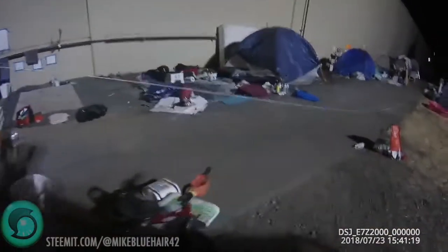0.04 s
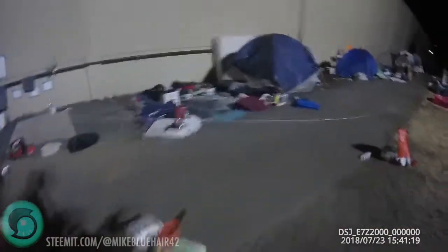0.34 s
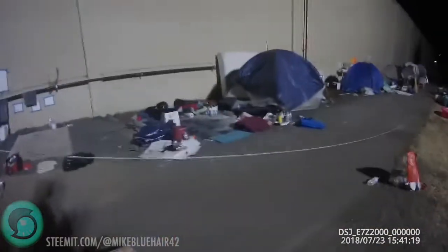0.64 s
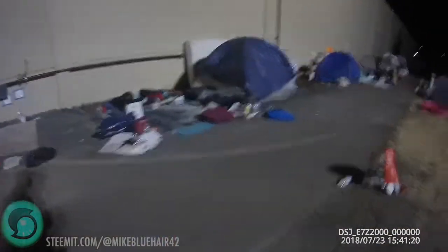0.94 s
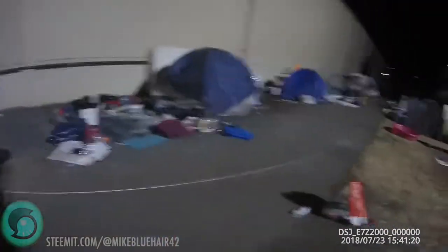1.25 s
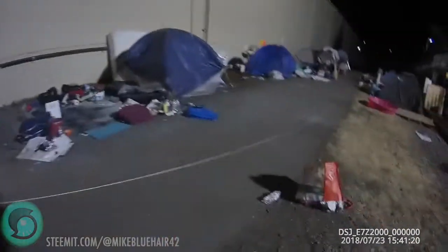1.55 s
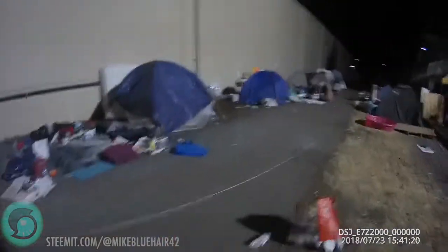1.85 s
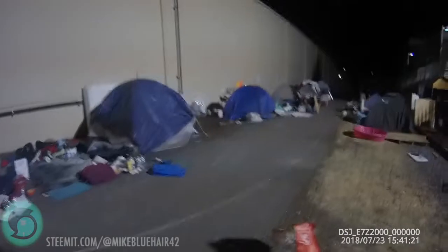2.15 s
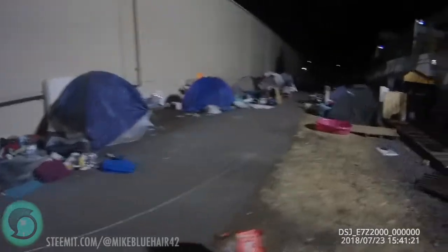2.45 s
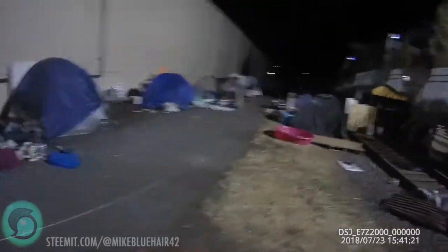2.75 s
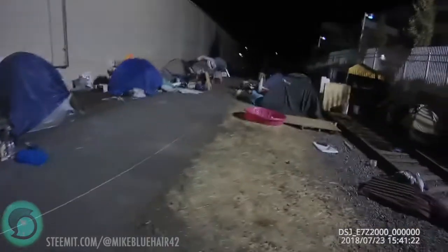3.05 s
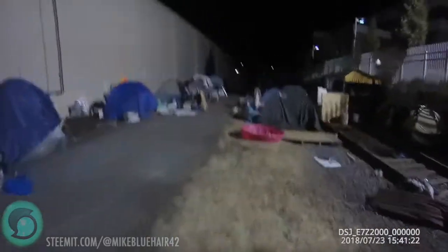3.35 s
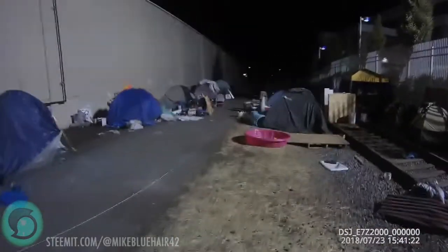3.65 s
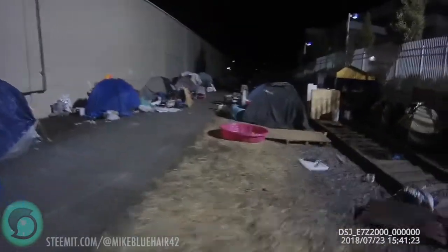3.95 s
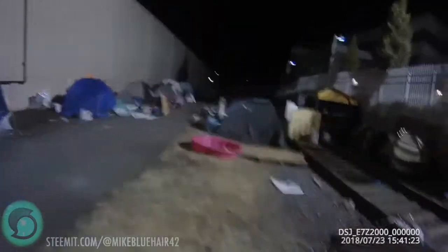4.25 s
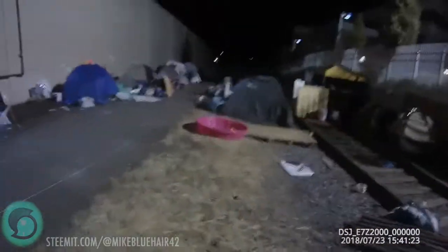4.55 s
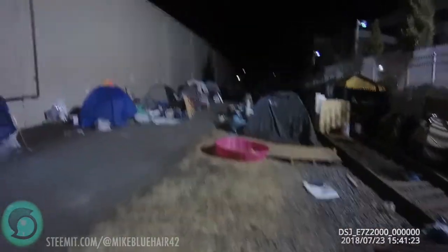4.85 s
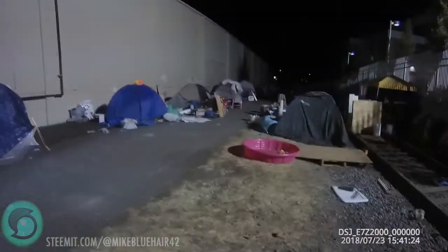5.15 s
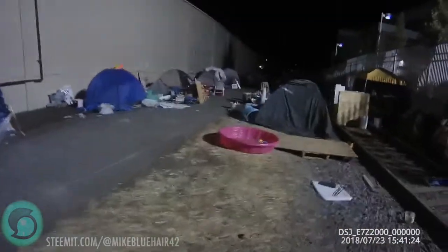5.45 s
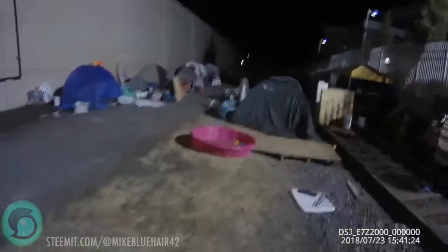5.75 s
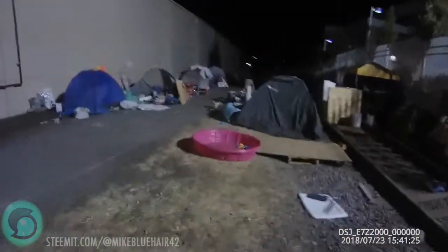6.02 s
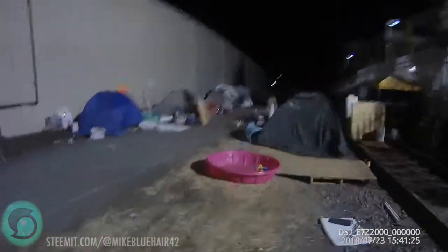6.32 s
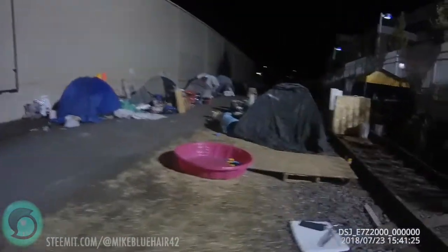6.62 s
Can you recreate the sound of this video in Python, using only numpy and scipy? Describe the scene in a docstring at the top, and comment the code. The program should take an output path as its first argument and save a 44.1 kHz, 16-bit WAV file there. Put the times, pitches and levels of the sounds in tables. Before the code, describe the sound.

A generator's low, steady drone runs under someone walking on snapping, scuffing gravel, then stepping quietly across dry grass.

```python
"""At night, a generator drones near a small mono microphone, over a hum, a town's wash and a faint hiss.
Someone walks over gravel and litter: stones snap under the soles, heels knock and grit scuffs.
From about two to four seconds in, a faint, far whine sinks in pitch.
Then the walker is on dry grass, and the last steps are soft knocks with tiny ticks of stalks."""
import sys
import numpy as np
from scipy import signal
from scipy.fft import rfft, irfft
from scipy.io import wavfile

SR = 44100
rng = np.random.default_rng(int(sys.argv[2]) if len(sys.argv) > 2 else 0)


def pcm_store(signal):
    """Save signal as 16-bit PCM."""
    levels = np.round(np.clip(np.atleast_2d(signal), -1, 1) * 32767)
    wavfile.write(sys.argv[1], SR, levels.astype(np.int16).T)


N = 298998
TIME = np.arange(N) / SR


# The loudest stones that snap under a sole. Body (lows) and fizz (highs) are relative to the level.
# (time [s], level [dB], ring pitch [Hz], body [dB], fizz [dB], fade time [s])
LOUD_STONES = [(0.2334, -33.5, 4800, -12, -35, 0.0065), (.6251, -27.5, 2210, -14, -17.5, 0.00025),
               (0.882, -27, 5300, -8.5, -11, 0.0011), (0.951, -35, 5700, -1, -19, .0013),
               (0.9842, -29.5, 3530, -20, -31, 0.005), (1.0154, -19, 2960, -10, -16, .00045),
               (1.0921, -23.5, 2900, -4, -9, 0.0025), (1.1004, -19.5, 2720, -5, -20, 0.0037),
               (1.1788, -30.5, 1520, -0.5, -33, 0.0011), (1.244, -22.5, 2800, -3.5, -16, 0.0027),
               (1.264, -21.5, 2640, -12, -18, 0.0014), (1.275, -28, 5540, -7, -16, .008),
               (1.3076, -24.5, 1500, -9, -17, 0.0027), (1.3445, -22, 5800, -5.5, -17, 0.0044),
               (1.358, -20.5, 4770, -7, -9, 0.0032), (1.3859, -19, 5750, -11, -14, 0.00052),
               (1.3991, -21.5, 4770, -19, -24, 0.00053), (1.4207, -17.5, 5600, -7.5, -9.5, 0.00047),
               (1.4421, -13, 4330, -13.5, -13, 0.0013), (1.4669, -9.5, 3780, -6, -17, 0.0013),
               (1.4863, -19.5, 5620, -6, -14, .001), (1.5101, -29.5, 5950, -5, -13, 0.00056),
               (1.5779, -32, 5200, 3, -24, 0.0019), (1.7862, -35, 4370, 4, -29, 0.00099),
               (1.8396, -21.5, 5670, -4.5, -17, 0.0023), (1.884, -22, 5230, -12, -18, 0.00066),
               (1.89, -26, 4730, -6, -19, 0.0065), (1.9034, -17, 5400, -18, -15, 0.0015),
               (1.9384, -29.5, 4400, -20, -5, 0.0011), (1.9975, -19.5, 5600, -19, -9, 0.00044),
               (2.0995, -31.5, 3060, -4, -17, 0.0019), (2.196, -33, 4940, -8, -8, 0.0017),
               (2.369, -14, 5330, -11.5, -10.5, 0.00088), (2.7019, -24, 2750, -5.5, -13, 0.0011),
               (2.7125, -18.5, 7200, -13, -9, 0.0008), (2.755, -15.5, 4270, -15, -13, 0.0023),
               (2.7604, -25.5, 1750, -3, -32, 0.0038), (2.8155, -27, 4500, -12, -8, 0.00074),
               (2.839, -27, 5240, -0.5, -17, 0.0016), (2.8646, -24, 1980, -8, -15.5, 0.00041),
               (3.0016, -35, 4720, -5, -20, 0.00093), (3.5622, -25, 5400, -8, -18, .0013),
               (3.6083, -25, 6000, -2.5, -4.5, 0.0035), (3.6288, -17, 6100, -27, -11, .0012),
               (3.7082, -33, 5000, -1, -12, 0.0027), (6.5516, -24, 4800, -20, -1.5, 0.00013)]
def stone_snaps():
    """Stones, large and small, give way under the walker's weight."""
    out = np.zeros(N)
    for time, *stone in LOUD_STONES + small_stones():
        offset_s, sound = one_snap(*stone)
        add(out, time + offset_s, sound)
    return out


# The tone of stone hitting stone: (frequency [Hz], relative level [dB])
STONE_TONE = [(100, -13), (350, -7), (900, -7), (2500, -0.5), (5500, -0.5), (7000, -2), (8200, -10.5),
              (10000, -9), (11500, -10.5), (14500, -16), (16000, -116)]
def one_snap(db, ring_hz, body_db, fizz_db, fade_s, grind_s=0.00013, ring_s=0.00067, settle_s=0.0072):
    """A stone grinds, slips and rings, then grit settles. Returns the start offset and the sound."""
    size, lead_in = 1500, 90  # samples
    t = (np.arange(size) - lead_in) / SR
    grinding = np.exp(-abs(t) / grind_s) / 2
    dying = np.exp(-abs(t) / fade_s) + gain_of(-30) * np.exp(-abs(t) / settle_s)
    slips = rng.standard_normal(size) * np.where(t < 0, grinding, dying)
    slips[lead_in] = 1.4  # the main slip
    ring = np.sin(2 * np.pi * ring_hz * t) * np.exp(-abs(t) / ring_s) * (t > 0)
    crack = normalize(shape_tone(slips, STONE_TONE)) + gain_of(1) * normalize(ring)
    # the bands between body and fizz share the energy, 9 dB less per octave away from the ring
    edges_hz = np.array([350, 1500, 2200, 3300, 4600, 7500, 15000])
    lows, highs = edges_hz[1:-2], edges_hz[2:-1]
    octaves_away = abs(np.log2(np.sqrt(lows * highs) / ring_hz))
    shares = np.sqrt(np.log(highs / lows)) * gain_of(-9 * octaves_away)
    bands_db = [body_db, *20 * np.log10(shares / np.linalg.norm(shares)), fizz_db]
    tone = []
    for low, high, band_db in zip(edges_hz, edges_hz[1:], bands_db):
        boost_db = band_db - level_db(crack, low, high)
        tone += [(low * 1.1, boost_db), (high / 1.1, boost_db)]
    return t[0], gain_of(db) * shape_tone(crack, tone, size=1024)


def small_stones(per_s=26, most=8, body_db=-3, fizz_db=-19, fade_s=0.0017):
    """Smaller stones give way at random while a sole drags. Returns rows like those of LOUD_STONES."""
    rows = []
    for start, end, drag_db in SOLE_DRAGS:
        times = start + (np.arange(most) + rng.random(most)) / per_s
        for time, (force, smallness) in zip(times, rng.standard_normal((most, 2))):
            if time < end:
                db = drag_db + 3 + 2 * force  # a little louder than the drag's hiss
                ring_hz = 4030 * 2 ** (0.73 * np.tanh(smallness))
                rows.append((time, db, ring_hz, body_db, fizz_db, fade_s))
    return rows


# Dull knocks of the shoes: (time [s], relative level [dB], pitch [Hz])
HEEL_STRIKES = [(0.6252, -15, 314), (0.945, -16.5, 422), (1.1016, -12, 380), (1.3054, -16.5, 264),
                (1.467, -23, 630), (1.5781, -25, 380), (1.8888, -17, 337), (2.1985, -17, 344),
                (2.7562, -10, 390), (2.8415, -22, 400), (2.8776, -10.5, 456), (3.14, -16.5, 315),
                (3.6273, -15.5, 259), (3.7113, -17, 382), (4.8957, -13.5, 530), (5.5695, -19, 630),
                (6.201, -20, 503), (6.6037, -14.5, 334), (6.673, -22, 604)]
def heel_knocks(ring_cycles=9.6, ground_fade_s=0.0096):
    """A heel lands with a hard blow, the sole rings briefly and the ground shudders."""
    out, t = np.zeros(N), TIME[:round(0.1 * SR)]
    for time, db, hz in HEEL_STRIKES:
        blow = 0.27 * np.exp(-t * hz * 2.7)
        ring = 0.5 * gain_of(-60 * t * hz / ring_cycles)
        shoe = np.sin(2 * np.pi * hz * t) * (blow + ring)
        shudder = noise_band(len(t), hz * 0.17, hz * 1.66) * np.exp(-t / ground_fade_s)
        add(out, time, gain_of(db + 0.5) * shoe + gain_of(db - 14) * shudder)
    return out


# A sole drags over loose grit: (start [s], end [s], level [dB])
SOLE_DRAGS = [(0.203, 0.335, -44), (.93, 1.054, -33), (1.053, 1.18, -46), (1.167, 1.299, -35),
              (1.299, 1.54, -45.5), (1.533, 1.587, -41.5), (1.774, 2.05, -41), (2.078, 2.263, -47),
              (2.68, 2.767, -36), (2.769, 2.954, -44.5), (2.96, 3.108, -40), (3.112, 3.216, -49.5),
              (3.347, 3.557, -50.5), (3.542, 3.73, -45), (6.66, 6.8, -52)]
# The tone of dragged grit: (frequency [Hz], relative level [dB])
GRIT_TONE = [(100, -39), (350, 17), (900, 8), (2500, 4.5), (5500, 5.5), (7000, -3), (8200, -5),
             (10000, -6.5), (14500, -11), (16000, -52)]
def scuffs(sand_db=-6, lumps_db=4):
    """Small grains rattle over a sandy hiss, swelling in uneven lumps with each drag."""
    force = np.zeros(N)
    for start, end, db in SOLE_DRAGS:
        add(force, start, gain_of(db) * signal.windows.tukey(round((end - start) * SR), 0.32))
    rattle = grains(per_s=3000, spread_db=4.5)
    sand = gain_of(sand_db) * rng.standard_normal(N)
    grit = shape_tone(rattle + sand, GRIT_TONE)
    return force * normalize(grit * gain_of(lumps_db * wobble(40)))


def grains(per_s, spread_db, damping=0.52, pitches=24):
    """Pebbles of many pitches are struck at random moments with uneven strength."""
    out = np.zeros(N)
    for hz in np.geomspace(600, 14000, pitches):
        strength = gain_of(spread_db * np.minimum(rng.exponential(1, N), 4))
        direction = rng.choice([-1, 1], N)
        struck = rng.random(N) < per_s / pitches / SR
        out += resonate(strength * direction * struck, hz, hz * damping)
    return normalize(out)


def footfalls(first_s=1.196, gap_s=0.377, length_s=0.42, count=7, db=-32.5):
    """Heavy, even steps on the gravel shake the microphone in soft, low swells."""
    weight = np.zeros(N)
    for time in first_s + gap_s * np.arange(count):
        add(weight, time - length_s / 2, signal.windows.hann(round(length_s * SR)))
    return gain_of(db) * weight * noise_band(N, 51.3, 86)


# Dry stalks that tick: (time [s], level [dB], rough pitch [Hz])
DRY_STALKS = [(.583, -41.5, 7000), (1.324, -33, 6500), (2.332, -44, 5500), (3.1534, -40, 5400),
              (5.47, -41, 6450), (6.109, -41.5, 3350), (6.199, -39.5, 1720), (6.41, -50, 11600),
              (6.605, -39.5, 5540)]
def stalk_ticks(fade_s=0.0041):
    """Each dry stalk gives a tiny burst of noise that dies at once."""
    out, t = np.zeros(N), TIME[:round(0.02 * SR)]
    for time, db, hz in DRY_STALKS:
        burst = rng.standard_normal(len(t)) * np.exp(-t / fade_s)
        tick = band(burst, hz * 0.58, hz * 1.25)
        add(out, time, tick * gain_of(db - level_db(tick, 0, SR / 2)))
    return out


def rustle(db=-59):
    """Grass and litter crackle faintly all along the way."""
    crackles = shape_tone(grains(per_s=80, spread_db=2), STONE_TONE)
    return gain_of(db) * normalize(band(crackles, 500, 12000, order=1))


def yard_echoes(sound, die_away_s=0.48, echoes_per_s=2000):
    """The ground, the tents and a wall throw back scattered echoes."""
    t = TIME[:SR // 2]
    echoes = rng.standard_normal(len(t)) * (rng.random(len(t)) < echoes_per_s / SR)
    echoes *= gain_of(-60 * t / die_away_s)
    dulled = band(echoes / np.linalg.norm(echoes), 250, 3200, order=1)
    return signal.fftconvolve(sound, dulled)[:N]


# The generator's tones, at 1, 2, 3... times its firing rate:
# (direct level [dB], share the wall throws back [0-1], quietest time [s], time between quiet spots [s])
ENGINE_TONES = [(-24.5, 0.27, 0.79, 9), (-31, 0.29, 4.02, 4.44), (-36, 0.39, 7.14, 9.5),
                (-39.5, 0.56, 2.23, 11.9), (-45.5, 0.07, 3.6, 4.9)]
def generator(firing_hz=44.41, waver=0.004, flutter_db=0.16, lag_cycles=0.059):
    """Exhaust pulses make a drone. The walker passes spots where a wall's echo partly cancels a tone."""
    firings = np.cumsum(firing_hz * (1 + waver * wobble(8.8))) / SR
    out = np.zeros(N)
    for k, (db, echo, quiet_s, spacing_s) in enumerate(ENGINE_TONES):
        with_echo = 1 - echo * np.exp(2j * np.pi * (TIME - quiet_s) / spacing_s)
        # the silencer delays the higher tones a little, which rounds each pulse
        cycles = (k + 1) * firings - lag_cycles * k ** 2 / 2
        tone = (with_echo * np.exp(2j * np.pi * cycles)).real
        out += gain_of(db - flutter_db * wobble(7)) * tone
    return np.sqrt(2) * out


# How a machine's hum swells and fades along the way: (time [s], relative level [dB])
HUM_LEVELS = [(0, -44.5), (.7, -40), (1.7, -39), (2.4, -44.5), (3.4, -38.5), (4.7, -44), (5.2, -47.5),
              (6.78, -47.5)]
def machine_hum(hz=348.8, waver_hz=1.66):
    """A machine hums in a dull wash of noise, and ends fainter as the walker leaves it behind."""
    tone = gain_of(-4.5) * sine(hz + waver_hz * wobble(6.1))
    wash = gain_of(-3) * noise_band(N, 255, 432)
    return gain_of(np.interp(TIME, *np.transpose(HUM_LEVELS))) * (tone + wash)


# Steady tones of far machines: (pitch [Hz], width of the waver [Hz], level [dB])
MACHINE_TONES = [(1094, 4.9, -56.5), (1590, 3.8, -81), (2182, 20.7, -64), (6230, 183, -80)]
def far_machines(flutter_db=0.53):
    """Far machines give faint tones that waver in pitch and loudness."""
    out = np.zeros(N)
    for hz, width, db in MACHINE_TONES:
        out += gain_of(db + flutter_db * wobble(1.7)) * sine(hz + width / 2 * wobble(2 * width))
    return out


# How a far whine swells and fades: (time [s], level [dB])
WHINE_LEVELS = [(2.3, -66), (2.5, -48.5), (2.75, -51), (2.87, -42), (3, -56), (3.8, -64), (3.93, -46),
                (4.35, -62)]
def far_whine(start_hz=485.5, sink_hz_per_s=61, waver=0.0138, flutter_db=4):
    """A faint, rough whine sinks steadily in pitch."""
    times, db = np.transpose(WHINE_LEVELS)
    hz = (start_hz - sink_hz_per_s * (TIME - times[0])) * (1 + waver * wobble(40.3))
    loudness = gain_of(np.interp(TIME, times, db) + flutter_db * wobble(29))
    sounding = (TIME > times[0]) & (TIME < times[-1])
    return loudness * sine(hz) * sounding


# The tone of the town's wash and hiss: (frequency [Hz], relative level [dB])
TOWN_TONE = [(150, -22), (250, -8), (330, -11), (520, -7), (1030, -9), (1120, -11), (1250, -13.5),
             (2240, -17.5), (2900, -22.5), (4000, -25), (5790, -20.5), (8040, -36), (14200, -42),
             (15500, -52)]
# The tone of the rumble below it: (frequency [Hz], relative level [dB])
RUMBLE_TONE = [(10, -21.5), (25, 11.5), (40, -2), (75, -2.5), (110, -6), (160, -9.5), (230, -14),
               (320, -16), (600, -62)]
def town(wash_db=-42, rumble_db=-33):
    """The town at night blurs into a steady wash and a faint hiss, over a low rumble."""
    wash = normalize(shape_tone(rng.standard_normal(N), TOWN_TONE))
    rumble = normalize(shape_tone(rng.standard_normal(N), RUMBLE_TONE))
    return gain_of(wash_db) * wash + gain_of(rumble_db) * rumble


def gain_of(db):
    """Turns decibels into a number to multiply a sound by."""
    return 10 ** (np.asarray(db) / 20)


def normalize(x):
    """Scales a sound to an average strength (rms) of 1."""
    return x / np.sqrt(np.mean(x ** 2) + 1e-20)


def level_db(x, low_hz, high_hz, spread_s=0.00635):
    """Level of a short sound between two frequencies, with its energy spread over spread_s."""
    hz = np.fft.rfftfreq(len(x), 1 / SR)
    energy = 2 * np.sum(abs(rfft(x)[(hz > low_hz) & (hz < high_hz)]) ** 2) / len(x)
    return 10 * np.log10(energy / (spread_s * SR) + 1e-20)


def add(mix, start_s, sound):
    """Mixes a sound in at the given time."""
    part = mix[max(round(start_s * SR), 0):][:len(sound)]
    part += sound[:len(part)]


def band(x, low_hz, high_hz, order=2):
    """Keeps mostly what lies between two frequencies."""
    return signal.sosfilt(signal.butter(order, [low_hz, high_hz], "band", fs=SR, output="sos"), x)


def noise_band(size, low_hz, high_hz):
    """Noise of strength 1 between two frequencies."""
    return normalize(band(rng.standard_normal(size), low_hz, high_hz))


def sine(hz):
    """A pure tone of strength 1 that follows a changing pitch."""
    return np.sqrt(2) * np.sin(2 * np.pi * np.cumsum(hz) / SR)


def shape_tone(x, points, size=4096):
    """Turns frequencies up or down along a curve of (frequency [Hz], level [dB]) points."""
    hz, db = np.transpose(points)
    log_hz = np.log(abs(np.fft.fftfreq(size, 1 / SR)) + 1)
    log_gain = np.log(gain_of(np.interp(log_hz, np.log(hz), db)))
    # this filter rings only after a hit, never before it
    taps = np.fft.ifft(np.exp(np.conj(signal.hilbert(log_gain)))).real
    return signal.fftconvolve(x, taps)[:len(x)]


def resonate(x, hz, width_hz):
    """Makes a sound ring at one pitch; a narrower width rings longer."""
    decay = np.exp(-np.pi * width_hz / SR)
    return 2 * signal.lfilter([1 - decay], [1, -decay * np.exp(2j * np.pi * hz / SR)], x).real


def wobble(rate_hz):
    """A smooth random wander of strength 1, up to about the given rate."""
    keep_slow = np.exp(-(np.fft.rfftfreq(N, 1 / SR) / rate_hz) ** 2)
    return normalize(irfft(rfft(rng.standard_normal(N)) * keep_slow, N))


def scene(echo_db=-23):
    """Close steps and their weak echoes over the background, alike in both channels."""
    background = generator() + machine_hum() + far_machines() + far_whine() + town()
    shaking = footfalls()
    steps = heel_knocks() + scuffs() + rustle() + stalk_ticks() + stone_snaps()
    mix = steps + gain_of(echo_db) * yard_echoes(steps) + shaking + background
    return np.array([mix, mix])


def record(dry, top_hz=16050):
    """The sharpest snaps clip at full scale, then the highest treble is cut away."""
    clipped = np.clip(dry, -1, 1)
    treble_cut = signal.firwin(255, top_hz, window=("kaiser", 11), fs=SR)
    return signal.oaconvolve(clipped, treble_cut[None], "same")


dry = scene()
out = record(dry)
pcm_store(out)
```